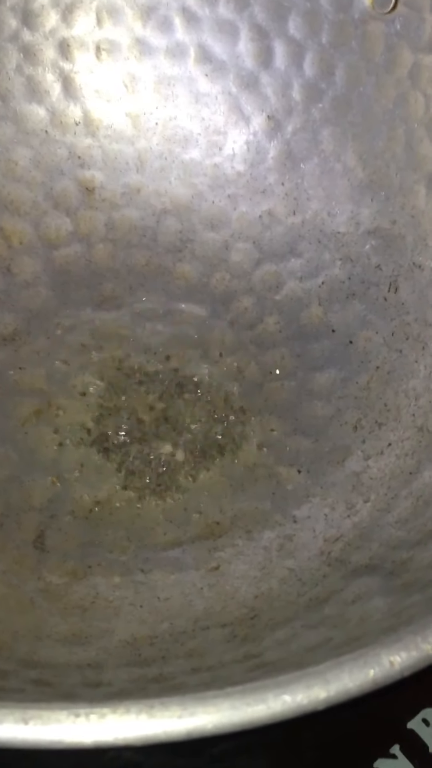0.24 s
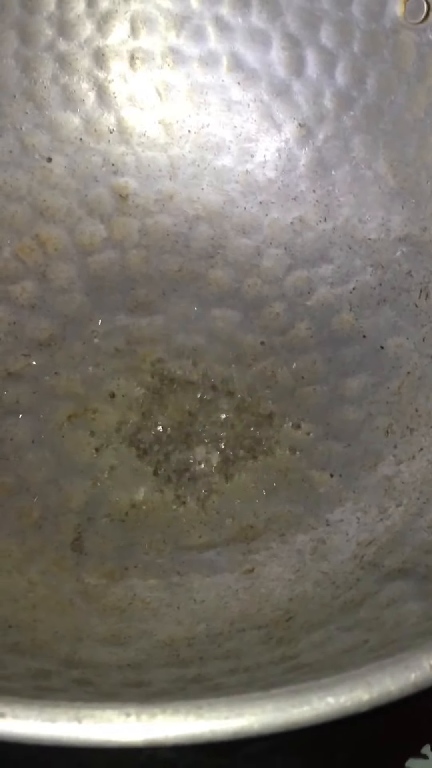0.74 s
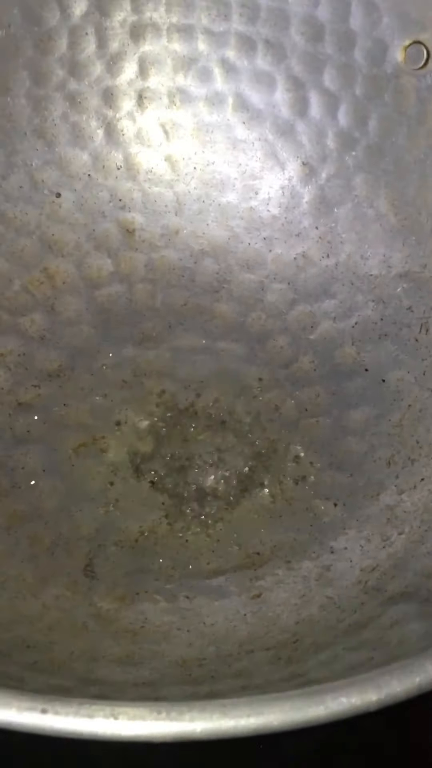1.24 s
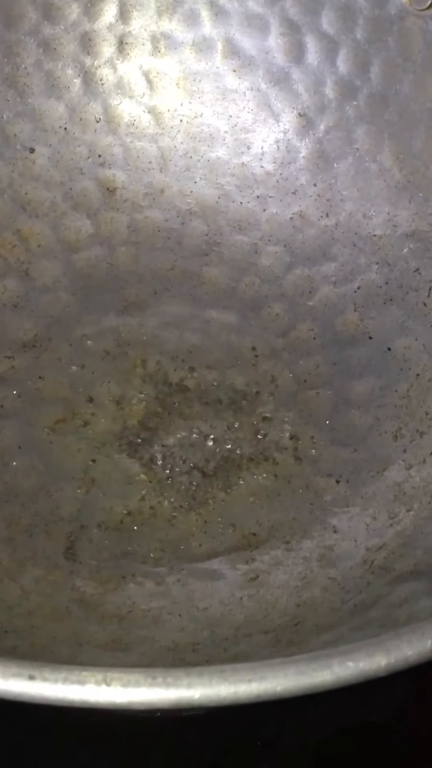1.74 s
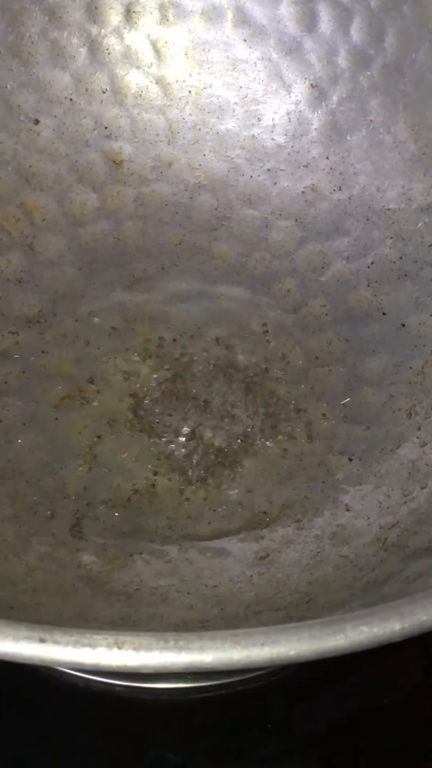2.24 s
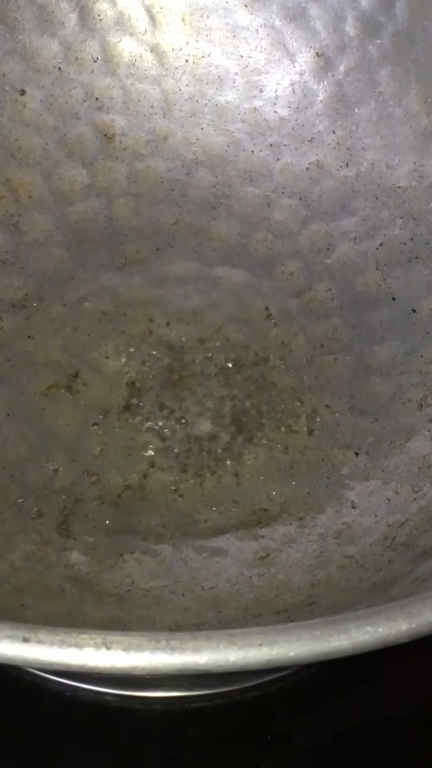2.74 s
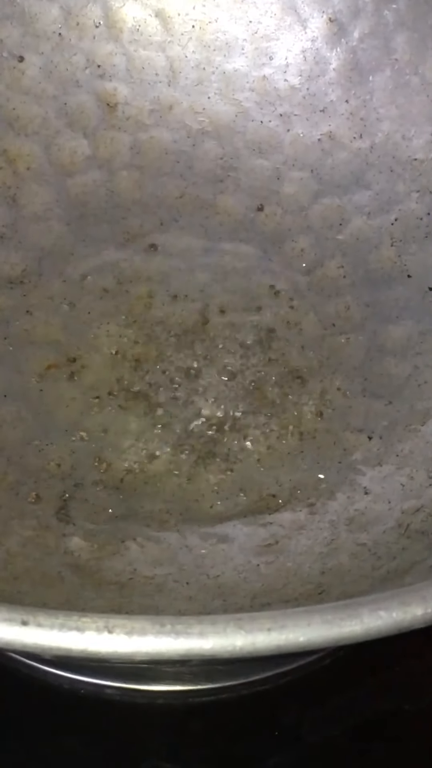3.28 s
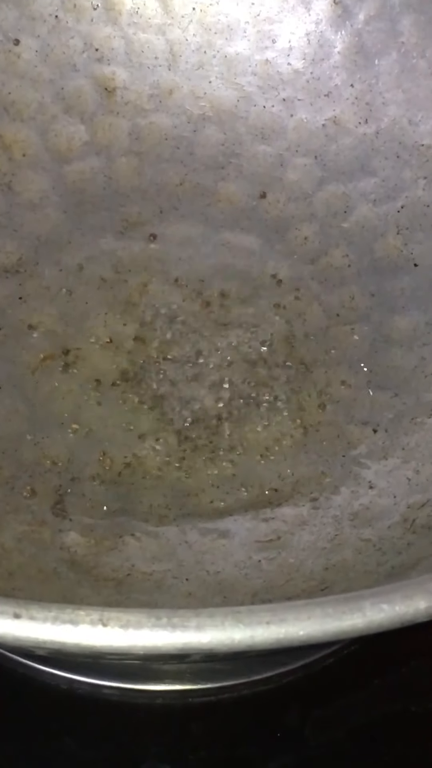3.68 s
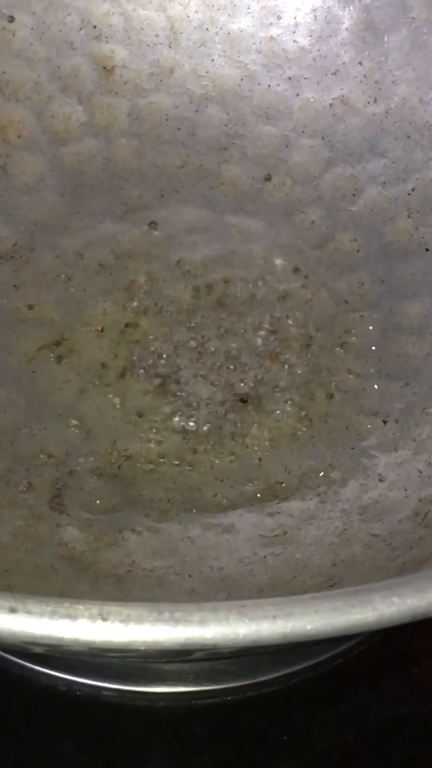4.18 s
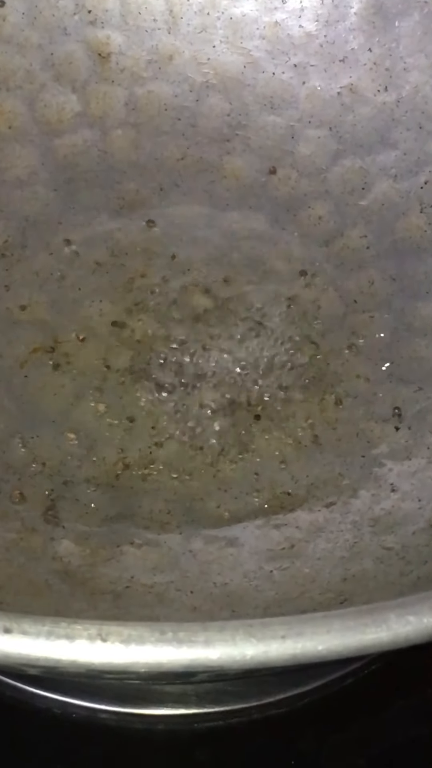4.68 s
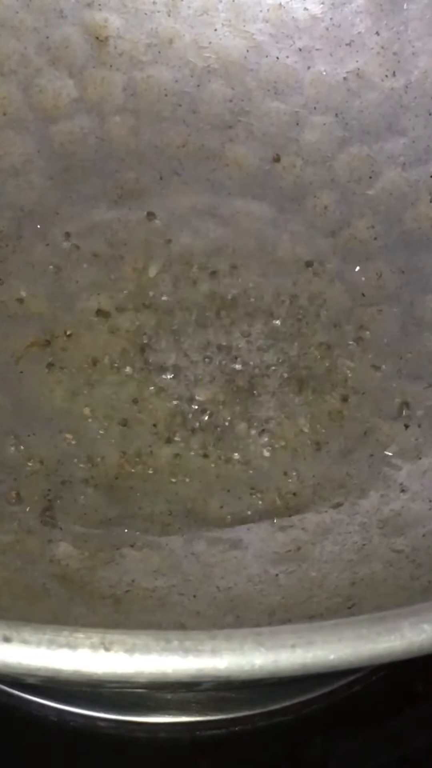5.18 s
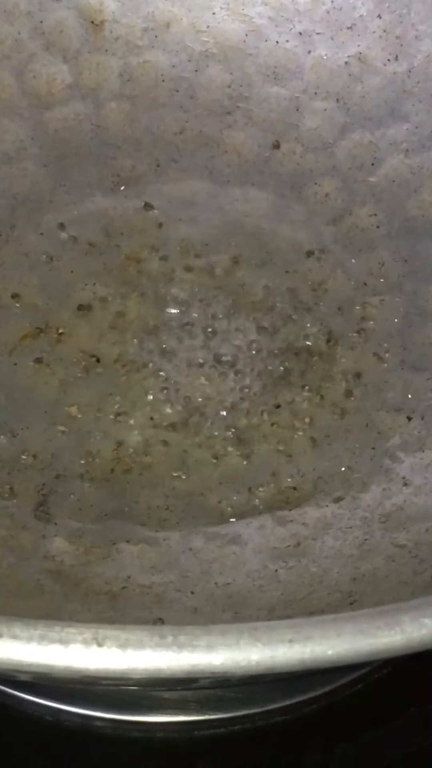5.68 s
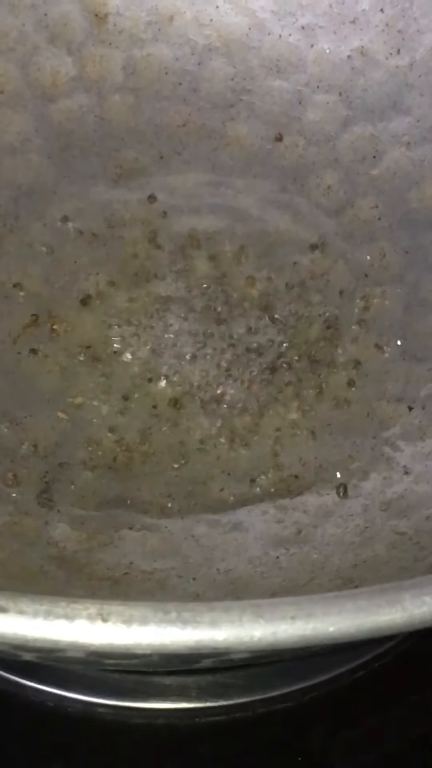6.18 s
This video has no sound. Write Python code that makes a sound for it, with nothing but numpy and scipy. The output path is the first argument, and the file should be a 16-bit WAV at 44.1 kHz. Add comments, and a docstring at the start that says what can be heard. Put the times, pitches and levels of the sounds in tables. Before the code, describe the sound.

A close phone microphone catches steady, uneven crackling from tiny seeds in a metal pan. After a busy start there is a short thinner gap with a bubble blip, then dense popping continues, crowding most just before five seconds and easing briefly near the end. Thin sizzle, small dry ticks and a soft low hum accompany it in a small, fairly dry kitchen.

```python
"""Mustard seeds burst in hot oil in a hammered metal pan, close under a phone in a small kitchen.
Each burst is a noisy snap and tear of the coat plus a steam puff, a short pitched swing; pan and room ring after it.
Random clicks through the pan's echoes make the fizz of tiny bubbles; filtered noise makes the finest hiss.
Specks tick on the phone, a bubble rings, oil thuds, a rustle and a low rumble swell.
Sines and shaped noise make the electric hob's hum and fan underneath."""
import sys
import numpy as np
from scipy import signal
from scipy.fft import rfft, irfft
from scipy.io import wavfile

SR = 44100
rng = np.random.default_rng(int(sys.argv[2]) if len(sys.argv) > 2 else 0)


def to_wav(sig):
    """Store sig (one row per channel, or 1-D mono) as 16-bit WAV at the path in sys.argv[1].

    Samples outside -1..1 are clipped; the rate is SR.
    """
    pcm = np.clip(np.atleast_2d(sig), -1, 1) * 32767
    pcm = np.round(pcm).astype(np.int16)
    wavfile.write(sys.argv[1], SR, pcm.T)  # frames by channels


N = 283122

# loud seed bursts; top_db is the crack's top band over its middle band
# [start_s, puff_pitch_hz, puff_db, crack_db, top_db]
LOUD_SEEDS = [(.016, 4100, -39, -36, -33), (.0667, 2010, -22, -26, -14), (.1782, 2100, -21, -34, -4),
              (.237, 4300, -29, -27, -8), (.2606, 2780, -34, -38, -9), (.2974, 2050, -25, -26, 9),
              (.3618, 2640, -31, -35, -1), (.3705, 4140, -32, -37, -5), (.492, 2920, -42, -40, -1),
              (.583, 2450, -37, -44, -7), (.6964, 2020, -44, -42, -17), (.7434, 2590, -20, -25, -13),
              (.8183, 3400, -33, -25, -8), (.8863, 2750, -27, -41, 11), (.9112, 2900, -32, -45, -25),
              (1.0078, 3750, -33, -31, -15), (1.0508, 2720, -20, -24, -6), (1.1682, 2160, -31, -39, 3),
              (1.1808, 4140, -36, -31, -14), (1.2277, 2800, -23, -27, -23), (1.2423, 4080, -33, -41, -2),
              (1.2484, 4330, -34, -28, -1), (1.3516, 2280, -22, -33, -4), (1.413, 2200, -48, -32, 8),
              (1.4494, 4260, -31, -30, -14), (1.4965, 2940, -24, -29, -15), (1.548, 4150, -29, -38, -13),
              (1.5817, 3000, -31, -48, -13), (1.6102, 2100, -33, -31, -16), (1.707, 4670, -31, -27, -17),
              (1.7307, 2090, -27, -33, -8), (1.752, 3500, -33, -27, 2), (1.841, 2830, -26, -26, -9),
              (1.8803, 2820, -22, -28, -10), (1.9098, 2840, -36, -33, -26), (1.955, 2800, -28, -43, -5),
              (2.004, 2940, -30, -40, -14), (2.0192, 2700, -33, -30, 13), (2.063, 3750, -28, -27, -9),
              (2.1326, 2670, -29, -36, -12), (2.1518, 4070, -31, -39, -6), (2.2019, 2840, -24, -24, 1),
              (2.2192, 4400, -25, -31, -9), (2.2793, 2040, -32, -38, -15), (2.339, 3530, -29, -28, -4),
              (2.4853, 3750, -29, -29, -2), (2.548, 3750, -34, -33, -13), (2.636, 3180, -37, -45, -8),
              (2.6713, 2240, -31, -41, -8), (2.7168, 4460, -43, -30, -18), (2.7604, 2970, -25, -27, -4),
              (2.798, 2060, -28, -34, -10), (2.819, 2700, -24, -30, -2), (2.8532, 4550, -37, -23, -1),
              (2.935, 3230, -32, -35, -5), (2.9509, 2980, -31, -39, -10), (2.9725, 4200, -34, -31, -20),
              (3.0023, 2770, -33, -40, -16), (3.0912, 4180, -35, -35, -9), (3.1646, 3400, -40, -38, -23),
              (3.2337, 4330, -25, -31, -11), (3.2511, 2780, -29, -43, -2), (3.2677, 4200, -34, -38, -14),
              (3.3566, 3170, -32, -42, -1), (3.3951, 4450, -31, -25, -3), (3.4167, 2100, -30, -42, 1),
              (3.4561, 4110, -31, -35, -16), (3.4888, 4000, -39, -33, -17), (3.5141, 2860, -30, -35, -3),
              (3.5666, 2600, -27, -38, -14), (3.6338, 3100, -34, -31, -13), (3.6687, 2920, -31, -42, -10),
              (3.7163, 3700, -30, -45, -3), (3.7288, 3330, -30, -26, 0), (3.7667, 2680, -33, -48, -8),
              (3.8118, 3180, -32, -33, -11), (3.835, 4590, -35, -28, 2), (3.8893, 4600, -33, -36, -7),
              (3.9055, 2020, -24, -28, -2), (3.994, 3210, -34, -31, -13), (4.0852, 4530, -39, -27, 2),
              (4.1115, 2330, -31, -36, -14), (4.17, 2900, -29, -32, -14), (4.2201, 3250, -33, -33, -19),
              (4.28, 2800, -40, -32, -26), (4.3964, 4160, -42, -35, -6), (4.4556, 2480, -38, -46, 1),
              (4.4987, 3800, -33, -28, -14), (4.5671, 4230, -36, -28, -11), (4.6254, 3950, -26, -30, -7),
              (4.6698, 3000, -26, -27, -17), (4.7088, 3250, -32, -33, -2), (4.7366, 2950, -27, -28, -13),
              (4.7944, 4100, -33, -28, -11), (4.814, 3650, -33, -34, -23), (4.8368, 3800, -32, -34, -15),
              (4.8763, 4540, -25, -24, -6), (4.8963, 3600, -22, -23, -8), (4.9296, 2860, -30, -45, -11),
              (4.9376, 3750, -34, -26, -1), (4.9449, 2800, -22, -40, -6), (4.9539, 2600, -26, -27, -7),
              (5.036, 4000, -22, -29, 16), (5.088, 2640, -28, -41, -14), (5.1943, 2680, -28, -31, -8),
              (5.2489, 4360, -23, -28, -10), (5.3186, 2020, -30, -27, -8), (5.3311, 3070, -27, -39, -21),
              (5.367, 3000, -35, -31, -15), (5.4479, 2870, -26, -26, -13), (5.4614, 3190, -33, -42, -6),
              (5.4889, 2950, -33, -33, -11), (5.5268, 2800, -30, -38, -1), (5.5803, 3150, -27, -31, -17),
              (5.621, 4170, -31, -34, -10), (5.6902, 3930, -31, -33, -21), (5.7127, 2380, -30, -23, 11),
              (5.7242, 1890, -42, -25, 10), (5.7672, 2900, -28, -35, -16), (5.794, 2820, -22, -24, -6),
              (5.853, 2940, -25, -32, 1), (6.0669, 2930, -29, -30, -3), (6.182, 4400, -38, -30, -6),
              (6.1908, 2780, -26, -35, -16), (6.2105, 1950, -30, -39, -9), (6.289, 2880, -37, -30, 0),
              (6.3186, 2750, -31, -36, -16), (6.379, 3190, -28, -37, -3), (6.4038, 3500, -32, -21, 5)]
# specks hitting the phone [start_s, tick_db, knock_db, thump_db]
PHONE_SPECKS = [(0.3338, -6.5, -14.5, -33), (2.1987, -4, -38, -58), (2.2207, -8.5, -11.5, -38),
                (3.7282, -2, -21, -55), (4.043, -6.5, -14, -19), (4.9575, -16, -36, -60),
                (5.713, -7, -22, -36.5)]
# resonances of the pan bowl [centre_hz, width_hz, added_gain_db]
BOWL_MODES = [(1493, 34, 13.5), (1590, 22, 12), (1991, 36, 10), (1920, 110, 12.5), (2536, 40, 5),
              (2770, 120, 7.5), (3191, 60, 6), (3750, 60, 6), (3907, 40, 4), (4150, 110, 7),
              (5350, 510, 0.5), (6100, 140, 2), (6918, 80, 0), (8900, 2100, 1), (11200, 260, -2)]
# hob hum partials [pitch_hz, rms_db]
HUM_PARTIALS = [(100, -46.7), (123, -66.5), (205, -64.5), (517, -67.5)]
# spectrum of cooling fan and kitchen air [frequency_hz, relative_density_db]
FAN_SPECTRUM = [(25, -27), (50, -12), (80, -2), (150, -3), (220, -6), (350, -2.5), (550, -3), (800, -8),
                (1300, -6), (2500, -16), (5000, -32), (10000, -20), (16000, -23)]
# swells of soft low rumble [start_s, attack_s, hold_s, release_s, level_db]
RUMBLE_SWELLS = [(4.13, .11, .08, .14, -49), (4.36, .2, .06, .13, -46)]
# one faint rustle [start_s, attack_s, hold_s, release_s, level_db]
RUSTLE_SWELL = (.45, .012, .015, .17, -48)
# bursts that also thud in the oil [start_s, pitch_hz, envelope_peak_db]
OIL_THUDS = [(0.0657, 970, -18), (0.7425, 1430, -36), (1.0502, 1400, -22), (2.4862, 800, -29),
             (5.0355, 1210, -35), (6.0673, 810, -25)]
# how lively the pan is: chance that a small seed bursts at its turn [time_s, chance_0_to_1]
LIVELINESS = [(0, .3), (.2, .9), (.42, .05), (1.6, .15), (1.8, .7), (2.3, .4), (2.9, .7), (4.8, .7),
              (5.1, .3), (5.6, .5), (5.9, .05)]

FAN_DB, TOP_HZ = -51, 16000
RING_SIZE, ATTACK_SIZE = 8820, 353  # samples: 0.2 s of ring, 8 ms of attack
TIME_S = np.arange(N) / SR
AGE_S = np.arange(RING_SIZE) / SR
CLICK = 1. * (AGE_S == 0)

# small seeds: shortest delay after a loud burst, and spread of delays beyond it
NEIGHBOUR_WAIT_S, NEIGHBOUR_WINDOW_S = .012, .028
NEIGHBOUR_DB, STRAY_DB = -39, -43  # mid puff level: set off by another seed, or bursting alone
WEAK_CRACK_DB, WEAK_TOP_DB, WEAK_SPREAD_DB = -.5, -17, 3  # crack over puff, top over middle, +/- scatter
WEAK_LOW_HZ, WEAK_HIGH_HZ = 2400, 4000
SNAP_SHARE, SNAP_PER_DB, SNAP_SPREAD = .44, .015, .2  # snap's share of a crack, rise with top_db, +/- scatter


def undb(db):
    """Decibels to gain."""
    return 10 ** (np.asarray(db) / 20)


def band(x, lo_hz, hi_hz, order=2):
    """Causal band-pass."""
    sos = signal.butter(order, [lo_hz, min(hi_hz, .49 * SR)], "band", fs=SR, output="sos")
    return signal.sosfilt(sos, x + 1e-18)


def resonate(x, hz, width_hz):
    """One resonance, gain 1 at its centre."""
    return signal.lfilter(*signal.iirpeak(hz, hz / width_hz, fs=SR), x)


def unit(x, size=None):
    """Scale each row to rms 1 over its first samples (all by default)."""
    return x / np.sqrt(np.mean(x[..., :size] ** 2, axis=-1, keepdims=True))


def place(starts_s, sounds):
    """Lay each sound on the time line."""
    out = np.zeros(N + RING_SIZE)
    for start_s, sound in zip(starts_s, sounds):
        start = int(np.clip(start_s * SR, 0, N))
        out[start:start + len(sound)] += sound
    return out[:N]


def stir(swell, sound):
    """Let a sound rise, hold and fade."""
    *stages_s, level_db = swell
    return undb(level_db) * unit(sound) * np.interp(TIME_S, np.cumsum(stages_s), [0, 1, 1, 0])


def bowl(x):
    """The pan lifts the sound at each of its resonances."""
    return x + sum(undb(db) * resonate(x, hz, width_hz) for hz, width_hz, db in BOWL_MODES)


def echoes(count, wall_db=0, wall_s=0.002, hob_db=-17, hob_s=0.026, room_db=-27, room_t60_s=0.11, build_s=0.0021):
    """Dense reflections, different for each spot in the oil: pan wall, then hob and tiles, then the room."""
    envelope = undb(wall_db) * np.exp(-AGE_S / wall_s)
    envelope += undb(hob_db) * np.exp(-AGE_S / hob_s)
    envelope += undb(room_db) * np.exp(-np.log(1000) * AGE_S / room_t60_s)
    build = 1 - np.exp(-AGE_S / build_s)
    return envelope * build * rng.standard_normal((count, RING_SIZE))


def hob():
    """Steady sine hum over the rush of the cooling fan, noise shaped in frequency."""
    hz, density_db = np.transpose(FAN_SPECTRUM)
    bins_hz = np.fft.rfftfreq(N, 1 / SR)
    colour = undb(np.interp(np.log(bins_hz + 1), np.log(hz), density_db))
    air = unit(irfft(rfft(rng.standard_normal(N)) * colour, N))
    hum = sum(undb(db) * np.sqrt(2) * np.sin(2 * np.pi * (hz * TIME_S + rng.random()))
              for hz, db in HUM_PARTIALS)
    return undb(FAN_DB) * air + hum


def background(upper_db=-2.5):
    """A brief rustle of band noise, and later a low rumble in two broad bands."""
    noise = rng.standard_normal(N)
    rumble = band(noise, 102, 156) + undb(upper_db) * band(noise, 280, 362)
    rustle = band(noise, 1480, 1900)
    return sum(stir(swell, rumble) for swell in RUMBLE_SWELLS) + stir(RUSTLE_SWELL, rustle)


def specks(tick_s=.00008, knock_s=0.00057, thump_s=0.0085, sweep_rad=3.41, onset_s=.00004):
    """A speck on the phone gives a dry tick; the microphone swings back ever more slowly, down to a thump."""
    start_s, tick_db, knock_db, thump_db = np.array(PHONE_SPECKS).T[:, :, None]
    envelope = undb(tick_db) * np.exp(-AGE_S / tick_s)
    envelope = envelope + undb(knock_db) * np.exp(-AGE_S / knock_s)
    envelope = envelope + undb(thump_db) * np.exp(-AGE_S / thump_s)
    swing = np.sin(sweep_rad * np.log1p(AGE_S / onset_s))  # logarithmic phase: pitch falls as 1/age
    return band(place(start_s[:, 0], envelope * swing), 58, 20000, order=3)


def simmer(db=-57, flicker_db=2):
    """The finest fizz merges into a faint, unsteady hiss."""
    steps_s = np.arange(0, N / SR + .1, .06)
    flicker = np.interp(TIME_S, steps_s, rng.standard_normal(len(steps_s)))
    hiss = unit(band(bowl(rng.standard_normal(N) ** 3), 2200, 8400))
    return undb(db + flicker_db * flicker) * hiss


def thuds(swell_s=0.00015):
    """A strong burst shoves the oil aside: a cycle or two of lower pitch."""
    start_s, hz, db = np.array(OIL_THUDS).T[:, :, None]
    envelope = undb(db) * AGE_S / swell_s * np.exp(1 - AGE_S / swell_s)
    return band(place(start_s[:, 0], envelope * np.sin(2 * np.pi * hz * AGE_S)), 440, 5000)


def bubble(start_s=.5838, hz=2350, db=-24, ring_s=0.0032, rise_per_s=6):
    """One larger bubble rings, its pitch rising as it nears the surface."""
    cycles = hz * AGE_S * (1 + rise_per_s * AGE_S)
    return place([start_s], [undb(db) * np.exp(-AGE_S / ring_s) * np.sin(2 * np.pi * cycles)])


def sizzle(bursts_s, calm_per_s=45, stirred_per_s=40, settle_s=.06, spread_db=6.5, direct_db=17, db=-50.5):
    """Tiny bubbles burst at random, more of them while the oil is still stirred up by the last seeds."""
    stirred = place(bursts_s, [np.exp(-AGE_S / settle_s)] * len(bursts_s))
    sizes = undb(spread_db * np.minimum(rng.exponential(size=N), 3.5))
    signs = rng.choice([-1, 1], N)
    pops = sizes * signs * (rng.random(N) < (calm_per_s + stirred_per_s * stirred) / SR)
    paths = undb(direct_db) * CLICK + bowl(echoes(count=8))
    spot = rng.integers(0, len(paths), N)  # each pop takes one of the paths
    fizz = sum(signal.oaconvolve(pops * (spot == k), path)[:N] for k, path in enumerate(paths))
    return undb(db) * unit(band(band(fizz, 2850, 15000), 550, 4700, order=1))


def weak_seeds(starts_s, puff_db):
    """Rows like those of LOUD_SEEDS for small seeds of random pitch and strength."""
    pitch, puff, crack, top = rng.uniform(-1, 1, (len(starts_s), 4)).T
    hz = WEAK_LOW_HZ * (WEAK_HIGH_HZ / WEAK_LOW_HZ) ** ((pitch + 1) / 2)
    puffs_db = puff_db + WEAK_SPREAD_DB * puff
    cracks_db = puff_db + WEAK_CRACK_DB + WEAK_SPREAD_DB * crack
    tops_db = WEAK_TOP_DB + 2 * WEAK_SPREAD_DB * top
    return np.column_stack([starts_s, hz, puffs_db, cracks_db, tops_db])


def all_seeds(stray_count=12):
    """The loud bursts, neighbours they may set off and possible strays, thinned by the pan's liveliness."""
    loud = np.array(LOUD_SEEDS)
    delays_s = NEIGHBOUR_WAIT_S + NEIGHBOUR_WINDOW_S * rng.random(len(loud))
    neighbours = weak_seeds(loud[:, 0] + delays_s, NEIGHBOUR_DB)
    strays_s = (np.arange(stray_count) + rng.random(stray_count)) / stray_count * N / SR
    weak = np.vstack([neighbours, weak_seeds(strays_s, STRAY_DB)])
    bursts = rng.random(len(weak)) < np.interp(weak[:, 0], *np.transpose(LIVELINESS))
    return np.vstack([loud, weak[bursts]])


def leaks(starts_s, puff_db, db=-20.5, spread_db=6, rise_s=0.0028):
    """Leaking steam hisses, rising for 8 ms before each seed gives way, some louder than others."""
    hiss = unit(band(rng.standard_normal((len(starts_s), ATTACK_SIZE)), 2400, 5700))
    size = undb(puff_db + db + spread_db * rng.uniform(-1.1, 1, puff_db.shape))
    rise = np.exp(-AGE_S[:ATTACK_SIZE] / rise_s)[::-1]
    return place(starts_s - ATTACK_SIZE / SR, size * hiss * rise)


def puffs(hz, ring, swell_s=0.0006, turbulence=1.0, direct_db=1, width_hz=700, pitch_fade_s=0.041, broad_db=-10):
    """Escaping steam swings for a few cycles; its pitch soon fades into the broad ring of the bowl."""
    steam = rng.standard_normal(ring.shape)
    swell = AGE_S / swell_s * np.exp(-AGE_S / swell_s)
    jet = swell * (np.sin(2 * np.pi * hz * AGE_S) + turbulence * steam)
    pitched = np.array([resonate(r, f, width_hz) for r, f in zip(ring, hz[:, 0])])
    tail = pitched * np.exp(-AGE_S / pitch_fade_s) + undb(broad_db) * ring
    jet = unit(band(jet, 1590, 5460), ATTACK_SIZE)
    tail = unit(band(tail, 1590, 5460), ATTACK_SIZE)
    return unit(undb(direct_db) * jet + tail, ATTACK_SIZE)


def cracks(top_db, snap, ring, tear_s=0.002, tear_db=1, again_s=.004, again_share=1.0, slit_width_hz=400, slit_db=9):
    """The coat gives way with one snap, then tears twice in tiny cracks; each slit has its own shrill colour."""
    lag, share, slit = rng.random((len(ring), 3)).T[:, :, None]
    since_s = AGE_S - again_s * (0.28 + lag)  # age of the second tear
    second = again_share * share * (since_s > 0) * np.exp(-np.abs(since_s) / tear_s)
    tearing = np.exp(-AGE_S / tear_s) + second
    tears = unit(rng.standard_normal(ring.shape) ** 3 * tearing, ATTACK_SIZE)  # cubed: sparse, spiky noise
    scatter = unit(undb(tear_db) * tears + unit(ring, ATTACK_SIZE), ATTACK_SIZE)
    slits_hz = 4800 + 2400 * slit[:, 0]
    shrill = np.array([resonate(r, f, slit_width_hz) for r, f in zip(scatter, slits_hz)])
    snap = np.clip(snap, 0, .95)
    crack = np.sqrt(snap) * unit(CLICK, ATTACK_SIZE) + np.sqrt(1 - snap) * scatter
    middle = unit(band(crack + undb(slit_db) * (1 - snap) * shrill, 3680, 7780), ATTACK_SIZE)
    top = unit(band(crack, 9000, 15000), ATTACK_SIZE)
    return unit(middle - undb(top_db) * top, ATTACK_SIZE)


def seeds(rows):
    """Each bursting seed is a crack and a puff from its own spot in the pan; bright cracks snap more at once."""
    start_s, hz, puff_db, crack_db, top_db = rows.T[:, :, None]
    scatter = SNAP_SPREAD * rng.uniform(-1, 1, start_s.shape)
    snap = np.clip(SNAP_SHARE + SNAP_PER_DB * top_db + scatter, 0, 1)
    puff = undb(puff_db) * puffs(hz, bowl(echoes(len(rows))))
    crack = undb(crack_db) * cracks(top_db, snap, bowl(echoes(len(rows))))
    return place(start_s[:, 0], puff + crack) + leaks(start_s[:, 0], puff_db)


def scene():
    """Everything as it reaches the one microphone."""
    kitchen = hob() + background() + specks()
    oil = simmer() + thuds() + bubble()
    rows = all_seeds()
    return (kitchen + oil + seeds(rows) + sizzle(rows[:, 0]))[None]


def record(dry, notch_hz=10300, notch_width_hz=540, notch_depth=0.46):
    """The microphone port dips one narrow treble band, and the phone cuts the top."""
    heard = dry - notch_depth * resonate(dry, notch_hz, notch_width_hz)
    return signal.sosfilt(signal.ellip(8, .2, 70, TOP_HZ, fs=SR, output="sos"), heard)


dry = scene()
out = record(dry)
to_wav(out)
```